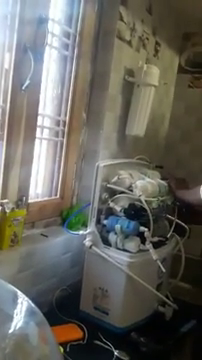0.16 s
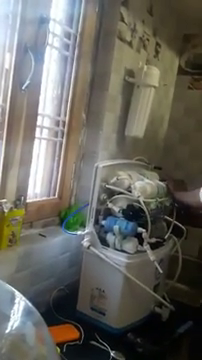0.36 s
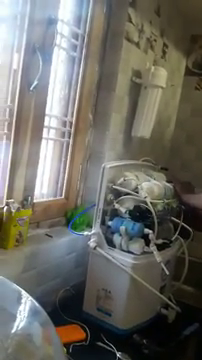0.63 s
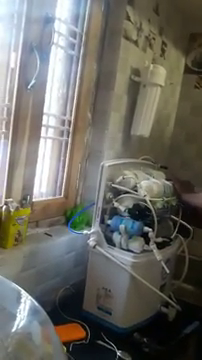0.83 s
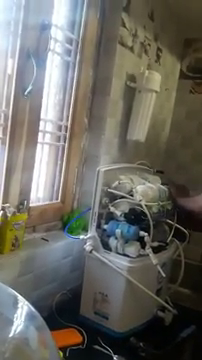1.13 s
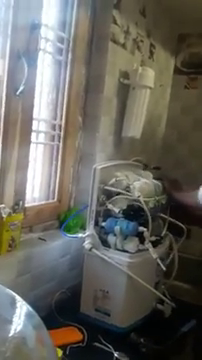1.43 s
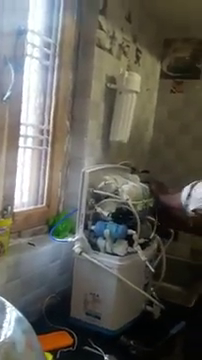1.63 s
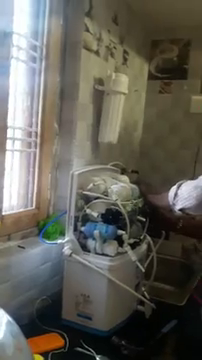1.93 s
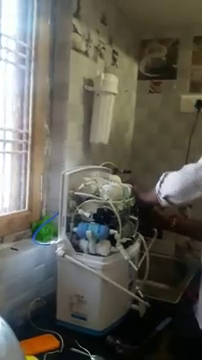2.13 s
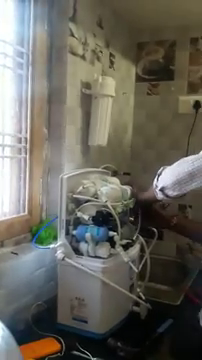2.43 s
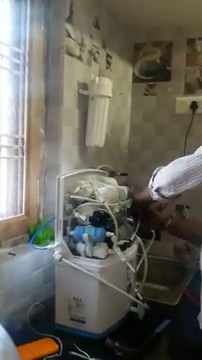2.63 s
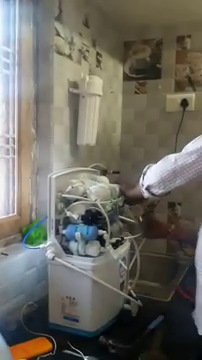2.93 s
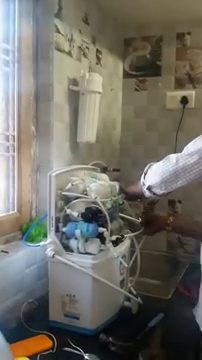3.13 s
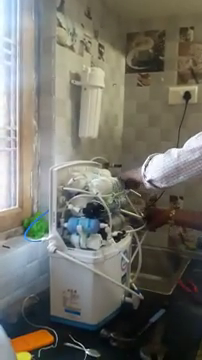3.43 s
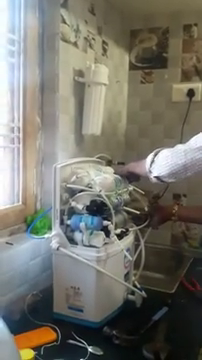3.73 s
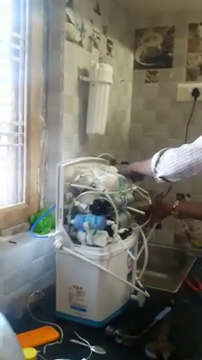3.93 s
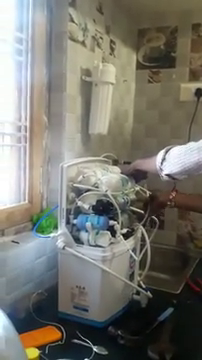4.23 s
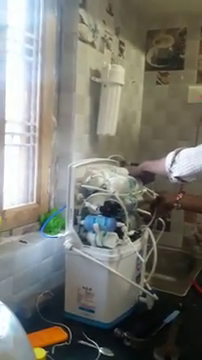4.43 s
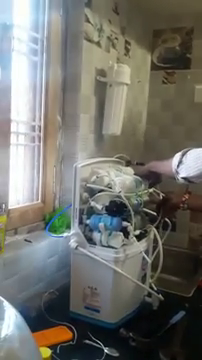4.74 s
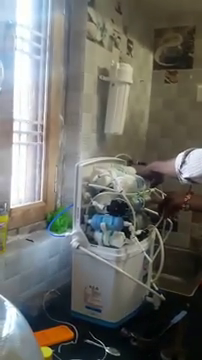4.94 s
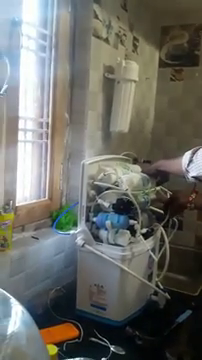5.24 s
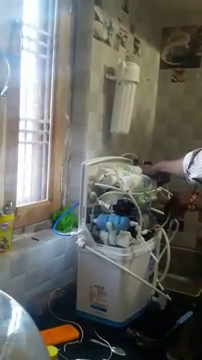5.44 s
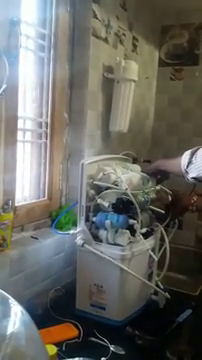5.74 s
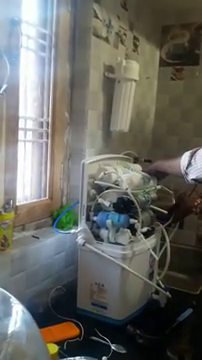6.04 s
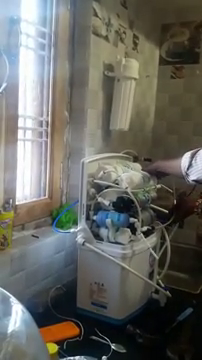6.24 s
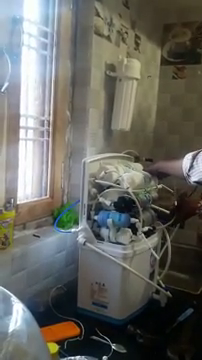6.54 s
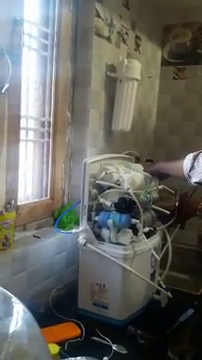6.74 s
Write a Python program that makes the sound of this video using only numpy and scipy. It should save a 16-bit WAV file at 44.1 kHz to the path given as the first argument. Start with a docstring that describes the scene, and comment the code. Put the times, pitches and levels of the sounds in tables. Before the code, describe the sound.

A small pump throbs quietly in a kitchen water purifier, with crackling air in the tubing and one short spurt of water. Suddenly a tube lets go, and a hard hissing spray whistles out and rings against a steel sink. It gradually loses pressure, leaving sputters, low gurgles and drips over the pump. The sound has a short tiled-room echo and little deep bass.

```python
"""The diaphragm pump of an opened water purifier throbs in a tiled kitchen, its knocks recurring with
each turn of the shaft, while air fizzes and squelches in the tubes. At 1.3 s a loosened tube spurts once.
At 2.8 s it releases a hard, shrieking jet of water and air whose drops excite the resonances of a steel
sink, and the unloaded pump runs a little faster. The jet darkens and fades as its pressure falls, and
from 5 s it gives way to a gurgling, spitting dribble."""
import sys
import numpy as np
from scipy import signal
from scipy.fft import rfft, irfft
from scipy.io import wavfile
from scipy.ndimage import uniform_filter1d

SR = 44100
rng = np.random.default_rng(int(sys.argv[2]) if len(sys.argv) > 2 else 0)


def digitize_waveform(pressure):
    """Quantize a signal to 16-bit integers and store it at the path in sys.argv[1].

    Rows of a 2-D input are taken as channels; values are limited to [-1, 1].
    """
    field = np.atleast_2d(pressure).T
    bounded = np.clip(field, -1, 1)
    quanta = np.round(bounded * 32767).astype(np.int16)
    wavfile.write(sys.argv[1], SR, quanta)


N = 302967
TIME = np.arange(N) / SR

# strength of the free jet: (time [s], level [dB])
JET_FLOW = [(2.84, -12.5), (3.46, -16.5), (3.6, -15.5), (4.14, -17.5), (4.25, -20), (4.42, -16.5),
            (4.78, -20), (5.17, -29.5), (5.23, -32)]
# spray at full, two-thirds, one-third and no pressure: (frequency [Hz], relative level [dB])
HARD_SPRAY = [(410, -52), (700, -22), (819, -8.5), (910, -16), (1060, -15), (1710, -8.5), (2270, -10.5),
              (2900, -2.5), (4430, -12), (5840, -11), (7290, -12), (10000, -21.5), (13000, -22.5),
              (16000, -34)]
FIRM_SPRAY = [(410, -50), (700, -17), (788, -8), (910, -20), (1020, -10), (1150, -17.5), (1420, -8),
              (2700, -1), (3250, -5), (3940, -12.5), (5920, -11), (7290, -9.5), (9800, -18), (13500, -21.5),
              (16000, -30)]
SOFT_SPRAY = [(410, -36), (700, -42), (767, -7), (898, -13), (1300, -5), (1840, -3.5), (2250, -1.5),
              (2770, 0.5), (3200, -6), (3940, -13), (5330, -9.5), (7200, -12), (9480, -21.5),
              (13000, -23.5), (16000, -36)]
SLACK_SPRAY = [(410, -43), (700, 3), (798, 7), (875, -5), (1040, 7), (1500, -2), (1840, -2), (2700, -7.5),
               (3940, -8), (5120, -13), (6400, -32.5), (12000, -27), (16000, -34)]
# resonances and antiresonances of sink and tube: (frequency [Hz], width [Hz], gain [dB])
SINK_RESONANCES = [(1022, 60, 3.5), (1162, 60, -4), (1259, 22, 7.5), (1438, 22, 8), (1830, 50, -3.5),
                   (2215, 50, -2), (1980, 30, 2), (2340, 40, -3), (2456, 22, 7), (2530, 40, -5),
                   (2645, 35, 4), (2738, 30, 6), (2828, 15, 5), (2965, 22, 5.5), (3270, 70, 3),
                   (3564, 25, 4.5), (3680, 90, -3), (4230, 70, 5), (4661, 170, -2.5), (5740, 60, 5.5),
                   (6010, 110, 4.5), (6196, 30, 5.5), (7250, 45, 7)]
# bottom of the sink drumming under the jet: (frequency [Hz], relative level [dB])
JET_DRUM_SPECTRUM = [(59, -62), (155, -29), (187, 0), (220, -7), (301, 3.5), (333, -22), (423, 4), (528, 0),
                     (784, -0.5), (900, -31), (1170, 3.5), (1980, -120)]
# spray of the spurt, and the sink drumming under it: (frequency [Hz], relative level [dB])
SPURT_SPECTRUM = [(290, -10), (500, 6.5), (630, -37), (843, -3), (1820, -2), (3200, 3.5), (3750, -1),
                  (4900, -3.5), (5850, 4.5), (6500, -2), (9350, -3), (10000, -8), (12500, -6), (16000, -18)]
SPURT_DRUM_SPECTRUM = [(90, -64), (172, 2.5), (231, -12), (273, 1.5), (389, -12), (612, -7.5), (674, -21),
                       (900, -13), (1170, -35), (1980, -120)]
# sputtering dribble, and its patter in standing water: (frequency [Hz], relative level [dB])
DRIBBLE_SPECTRUM = [(590, -53), (1000, -22), (1790, -13), (2030, -6), (2980, -6), (4260, -8), (6200, -3.5),
                    (7200, -6.5), (9800, -10.5), (15100, -13.5), (16000, -26)]
PATTER_SPECTRUM = [(240, -45), (329, -8), (550, -3), (676, -15), (830, 0), (1200, -5.5), (3500, -7.5),
                   (5500, -80)]
# knocks of diaphragms and valves in one turn of the shaft:
# (phase [turns], frequency [Hz], width [Hz], level [dB], decay time [s], change once unloaded [dB])
PUMP_KNOCKS = [(0.138, 810.5, 69, -49, 0.014, 4), (0.243, 430, 101, -52, 0.017, 6),
               (0.335, 610, 300, -59, 0.0064, -8), (0.577, 167, 30, -64, 0.022, 7.5),
               (0.71, 810, 100, -50.5, 0.0064, -34), (.74, 1400, 150, -52, 0.015, -26),
               (0.841, 515, 127, -55, 0.042, 0.5)]
# hum of the pump body: (multiple of shaft speed [ratio], loaded level [dB], unloaded level [dB])
PUMP_HARMONICS = [(15, -65, -81), (16, -61.5, -55), (17, -57.5, -84), (30, -72, -58), (39, -58.5, -68),
                  (47, -66, -56), (56, -61, -74), (70, -69, -66), (75, -60, -71), (81, -66, -71)]
# air pockets squeezed through the tubes:
# (time [s], level [dB], frequency [Hz], width over frequency [ratio], change per puff [dB])
SQUEEZED_POCKETS = [(.04, -49, 6650, 0.31, -11), (.087, -42, 2380, 0.29, -20), (.157, -45, 3730, .16, -12),
                    (0.363, -42, 2200, 0.17, -8), (.415, -46, 3500, 0.38, -5),
                    (.47, -43.5, 4350, 0.23, -15), (.67, -47.5, 3140, 0.18, -3),
                    (.76, -40.5, 3120, 0.24, -22), (.779, -33.5, 3910, .11, -17),
                    (.78, -48, 5560, 0.17, -10), (.946, -44.5, 5900, .2, -16),
                    (1.075, -59, 8700, 0.11, -24), (1.11, -48, 2350, 0.63, -20),
                    (1.836, -45, 2400, 0.18, -15), (2.09, -48, 5530, .27, -16),
                    (2.085, -44.5, 2800, .45, -13), (2.27, -49.5, 2974, .12, -9),
                    (5.388, -31, 2680, 0.42, -13), (5.433, -30, 2420, 0.48, -18),
                    (5.553, -41, 2887, .2, -20), (5.615, -39, 2680, .27, -15),
                    (5.672, -42.5, 2700, .2, -20), (6.23, -43, 2360, 0.32, -18),
                    (6.638, -35.5, 3100, .2, -14), (6.714, -41, 2360, .18, -1.5),
                    (6.773, -41.5, 2350, 0.26, -12)]
# sharp spits and clicks, including the tube cracking open:
# (time [s], level [dB], frequency [Hz], width [Hz])
SPITS_AND_CLICKS = [(.323, -40.5, 3020, 400), (.39, -47, 13900, 2960), (1.293, -31, 5170, 4000),
                    (1.449, -30, 9900, 4000), (1.849, -32, 2610, 700), (1.853, -41, 5500, 2980),
                    (1.879, -43.5, 4300, 3470), (1.903, -48, 6800, 1500), (2.802, -27, 11500, 6000),
                    (2.818, -31, 12500, 5000), (5.241, -26, 7900, 700), (5.241, -30, 2050, 250),
                    (5.402, -32, 2880, 1500), (5.441, -35.5, 3205, 2000), (5.613, -35.5, 5770, 2500),
                    (5.744, -30.5, 3340, 1900), (5.936, -36, 5000, 1800), (5.984, -34.5, 7500, 4000),
                    (6.04, -42, 13500, 3500), (6.093, -40, 11300, 1500), (6.218, -38.5, 8000, 5000),
                    (6.335, -43, 11900, 3000), (6.478, -34, 3730, 700), (6.587, -39, 5500, 2500),
                    (6.604, -39.5, 7300, 1500)]
# single drops on the steel: (time [s], level [dB], frequency [Hz])
DROP_IMPACTS = [(5.242, -30, 5000), (5.694, -34, 5600), (5.724, -36, 4800), (5.767, -34, 4400),
                (5.893, -29.5, 3300), (6.087, -33, 3154), (6.141, -34, 3730), (6.167, -36, 4630),
                (6.475, -28.5, 3920)]
# low gurgles, and thuds of water hitting the sink:
# (time [s], level [dB], frequency [Hz], width [Hz], decay time [s])
GURGLES_AND_THUDS = [(0.498, -44.5, 553, 69, 0.017), (1.105, -43.5, 483, 190, 0.044),
                     (1.128, -41, 192, 55, 0.016), (1.385, -31.5, 175, 34.8, .03),
                     (2.45, -50, 243, 100, 0.04), (3.235, -37.5, 312, 320, .082),
                     (5.48, -43.5, 200, 330, 0.06), (6.079, -40.5, 550, 150, 0.044),
                     (6.162, -37, 550, 140, 0.032), (6.299, -36, 547, 110, .04),
                     (6.441, -41.5, 552, 140, 0.046)]
# spells of fine air in the shut tubes: (start [s], end [s], level [dB])
FIZZ_SPELLS = [(0, 0.217, -51), (0.393, .63, -56), (0.844, 1.152, -53.5), (1.596, 1.78, -49.5),
               (1.865, 1.94, -51), (2.208, 2.43, -52.5), (2.514, 2.713, -57.5)]
# fizz of that air: (frequency [Hz], relative level [dB])
FIZZ_SPECTRUM = [(880, -41), (1500, 1), (2400, 1.5), (4690, -5.5), (7200, -8.5), (14500, -22.5),
                 (16000, -28)]
# noise of motor, flowing water and room: (frequency [Hz], relative level [dB])
BACKGROUND_SPECTRUM = [(26, -44), (45, -2.5), (109, -6.5), (174, 0), (291, -1), (432, -1), (798, -2.5),
                       (1150, -3.5), (1370, -6.5), (1670, -7), (3160, -8.5), (4140, -18), (5990, -13),
                       (12500, -29), (16000, -28)]
# reverberation of the kitchen: (frequency [Hz], time to fall 60 dB [s])
REVERB_TIMES = [(150, 0.43), (1000, 0.2), (4000, 0.34), (14000, 0.013)]
# dips and a peak of the microphone port: (frequency [Hz], width [Hz], gain [dB])
PORT_RESONANCES = [(3900, 260, -4), (8020, 300, -5.5), (8380, 300, 1.5)]

CRACK_S, FREE_S, OPENING_S = 2.784, 2.824, 0.024  # the joint cracks open, comes free, takes this to open


def jet():
    """Random impacts excite the sink's resonances; the spray darkens as the driving pressure falls."""
    leak_db, leak_rise_db_per_s, leak_tilt_db_per_octave = -33, 350, 3.5
    fall_db_per_s, slug_hz = 41, 38
    pressure = pressure_left()
    free = np.clip((TIME - FREE_S) / OPENING_S, 0, 1)
    leak_growth_db = leak_rise_db_per_s * (np.minimum(TIME, FREE_S) - CRACK_S)
    leak = (TIME > CRACK_S) * (1 - free) * gain_of(leak_db + leak_growth_db)
    fade_db = fall_db_per_s * np.maximum(TIME - JET_FLOW[-1][0], 0)
    flow = free * gain_of(np.interp(TIME, *np.transpose(JET_FLOW)) - fade_db)
    # at high pressure, slugs of water and air leave the tube in turn
    slug_phase = 2 * np.pi * np.cumsum(slug_hz * flutter(depth_db=-7, hz=7.8)) / SR
    slugs = gain_of(0.3 * pressure ** 2 * np.sin(slug_phase))
    impacts = drops(per_s=4000, spread_db=1.5, mist=0.74) * flutter(depth_db=-0.93, hz=119) * slugs
    hz, t, spectra = signal.stft(kitchen(impacts, wet_db=-9), SR, nperseg=2048, noverlap=1536)
    sprays = np.array([curve_at(s, hz) for s in (SLACK_SPRAY, SOFT_SPRAY, FIRM_SPRAY, HARD_SPRAY)])
    frame_pressure = np.interp(t, TIME, pressure)
    blend = [np.interp(frame_pressure, np.linspace(0, 1, 4), weights) for weights in np.eye(4)]
    tilt = np.interp(t, [FREE_S, FREE_S + OPENING_S], [leak_tilt_db_per_octave, 0])  # the leak is bright
    db = sprays.T @ blend + np.log2((hz[:, None] + 200) / 3000) * tilt
    db += resonance_db(SINK_RESONANCES, hz)[:, None]
    db += 20 * np.log10((hz[:, None] + 1) / (hz[:, None] + 400))  # fine spray carries no bass
    # the point of impact wanders, so the resonances come and go
    ripple = uniform_filter1d(rng.standard_normal(db.shape), size=9, axis=0)
    db += 1.42 * unit_rms(uniform_filter1d(ripple, size=22, axis=1))
    colour = gain_of(db) / np.sqrt(np.mean(gain_of(db) ** 2, axis=0))
    spray = unit_rms(signal.istft(spectra * colour, SR, nperseg=2048, noverlap=1536)[1][:N])
    spray *= flutter(depth_db=1, hz=70) ** (1 - pressure)  # the slack jet breaks up
    drum = coloured(drops(per_s=2200, spread_db=2.5, mist=0.49), JET_DRUM_SPECTRUM)
    return spray * (leak + flow) + drum * gain_of(-26) * flow ** 0.74


def pressure_left():
    """The driving pressure, as a share of its full value, falls linearly once the tube is free."""
    emptying_s = 2.87
    return np.clip(1 - (TIME - FREE_S) / emptying_s, 0, 1)


def whistle():
    """Flow-induced oscillation: at high pressure the tube's lip shrieks, unsteady in pitch and level."""
    pitch_hz = 2970 * flutter(depth_db=0.2, hz=260)
    tone = np.sin(2 * np.pi * np.cumsum(pitch_hz) / SR)
    shriek = unit_rms(tone * flutter(depth_db=3.5, hz=70))  # broken up by slugs of water
    level = gain_of(-21) * envelope(FREE_S, end_s=3.05, rise_s=OPENING_S, fall_db_per_s=33)
    return kitchen(shriek * level, wet_db=-6)


def spurt():
    """Impact noise: spray sags while the tube is briefly open and drives the sink's bottom to drum."""
    open_s, shut_s, sag_db_per_s = 1.292, 1.587, 20
    spray = coloured(drops(per_s=4000, spread_db=1.3, mist=1.1), SPURT_SPECTRUM)
    spray *= flutter(depth_db=0.7, hz=60)
    spray *= gain_of(-28 - sag_db_per_s * (TIME - open_s))
    spray *= envelope(open_s, shut_s, rise_s=0.0068, fall_db_per_s=167)
    drum = coloured(drops(per_s=410, spread_db=1.5, mist=0.73), SPURT_DRUM_SPECTRUM)
    drum *= gain_of(-34) * envelope(open_s, shut_s, rise_s=0.086, fall_db_per_s=107)
    out = spray + drum
    water_slug = burst(db=-25, hz=5550, width_hz=7000, decay_s=0.029, skirt=0.97, rise_s=0.0016)
    add(out, 1.366, water_slug)
    return out


def dribble():
    """Stream break-up: the slack, swaying flow sputters with bubbles, then patters in standing water."""
    start_s, settling_s, patter_start_s = 4.96, 0.48, 6.14
    sputter = pops(per_s=1100, spread_db=2.5, decay_s=0.007, breadth=0.18)
    sputter += 0.75 * drops(per_s=900, spread_db=1, mist=0.8)
    sputter = coloured(sputter * flutter(depth_db=1, hz=16), DRIBBLE_SPECTRUM)
    small_spits = pops(per_s=40, spread_db=2, decay_s=0.012, breadth=0.15)
    sputter += gain_of(-11) * coloured(small_spits, DRIBBLE_SPECTRUM)
    excess_db = 14 * np.exp(-np.maximum(TIME - start_s, 0) / settling_s)
    sputter *= gain_of(-46 + excess_db) * envelope(start_s, rise_s=0.14)
    landings = drops(per_s=760, spread_db=-1.5, mist=0.16) * flutter(depth_db=0.5, hz=30)
    patter = coloured(landings, PATTER_SPECTRUM) * gain_of(-43.5) * envelope(patter_start_s, rise_s=0.01)
    return kitchen(sputter + patter, wet_db=-7, wander_hz=1.3)


def pump():
    """Periodic excitation: knocks recur with each turn, over a hum of harmonics of the shaft speed."""
    loaded_hz, unloaded_hz, jet_drag_hz, spin_up_s = 11.16, 12.22, 0.075, 0.2
    relief = np.clip((TIME - CRACK_S) / spin_up_s, 0, 1)
    shaft_hz = loaded_hz + relief * (unloaded_hz - jet_drag_hz * pressure_left() - loaded_hz)
    turns = np.cumsum(shaft_hz) / SR
    out = np.zeros(N)
    # at the higher speed, other harmonics meet the resonances of the body
    for multiple, loaded_db, unloaded_db in PUMP_HARMONICS:
        tone = np.sin(2 * np.pi * (multiple * turns + rng.random()))
        harmonic = unit_rms(tone * flutter(depth_db=1.5, hz=12))
        out += gain_of(loaded_db + relief * (unloaded_db - loaded_db)) * harmonic
    for phase, hz, width_hz, db, decay_s, change_db in PUMP_KNOCKS:
        knock = burst(db, hz, width_hz, decay_s, skirt=0.92, rise_s=0.0016)
        for s in np.interp(np.arange(int(turns[-1]) + 1) + phase, turns, TIME):
            add(out, s, knock * gain_of(change_db * (s > CRACK_S) + 0.73 * rng.standard_normal()))
    return out


def squelches():
    """Smaller cavities resonate higher: an air pocket shrinks, each puff higher and fainter."""
    puffs, gap_s, pitch_ratio = 3, 0.085, 1.34
    out = np.zeros(N)
    for s, db, first_hz, breadth, step_db in SQUEEZED_POCKETS:
        for k in range(puffs):
            hz = first_hz * pitch_ratio ** k
            puff = burst(db + k * step_db, hz, breadth * hz, decay_s=0.033, skirt=0.72, rise_s=0.0069)
            add(out, s + k * gap_s, puff)
    return kitchen(out * flutter(depth_db=2.4, hz=170), wet_db=-6.5)


def spits_and_clicks():
    """Transients with an abrupt onset: sharp spits and clicks, including the tube cracking open."""
    out = np.zeros(N)
    for s, db, hz, width_hz in SPITS_AND_CLICKS:
        add(out, s, burst(db, hz, width_hz, decay_s=0.0088, skirt=1.05, rise_s=0.0007))
    return kitchen(out, wet_db=-4)


def ticks():
    """A brief impact has a broad spectrum: single drops tick on the steel."""
    out = np.zeros(N)
    for s, db, hz in DROP_IMPACTS:
        add(out, s, burst(db, hz, width_hz=0.38 * hz, decay_s=0.0023, skirt=0.92, rise_s=0.0002))
    return kitchen(out, wet_db=-6.5)


def gurgles_and_thuds():
    """Damped resonance: low gurgles, and thuds of water hitting the sink, waver as they die away."""
    out = np.zeros(N)
    for s, db, hz, width_hz, decay_s in GURGLES_AND_THUDS:
        add(out, s, burst(db, hz, width_hz, decay_s, skirt=2, rise_s=8 * decay_s ** 2))
    return kitchen(out * flutter(depth_db=-1, hz=90), wet_db=-4)


def fizz():
    """Superposition: fine air crackles in the tubes, and the smallest bubbles merge into a hiss."""
    level = sum(gain_of(db) * envelope(start_s, end_s, rise_s=0.0044, fall_db_per_s=91)
                for start_s, end_s, db in FIZZ_SPELLS)
    crackle = pops(per_s=1200, spread_db=3.5, decay_s=0.0042, breadth=0.23)
    crackle += 0.46 * rng.standard_normal(N)
    crackle *= flutter(depth_db=2, hz=25)
    return kitchen(coloured(crackle, FIZZ_SPECTRUM) * level, wet_db=-6.5)


def background():
    """Broadband noise of motor, flowing water and room forms a continuous floor."""
    noise = rng.standard_normal(N) * flutter(depth_db=2.5, hz=17)
    return gain_of(-48) * coloured(noise, BACKGROUND_SPECTRUM)


def kitchen(x, wet_db, wander_hz=0):
    """Direct and reverberant sound add; a wandering source keeps meeting different reflections."""
    if wander_hz:
        angle = 2 * np.pi * wander_hz * TIME
        wet = reflections(x * np.cos(angle)) + reflections(x * np.sin(angle))
    else:
        wet = reflections(x)
    return (x + gain_of(wet_db) * wet) / np.hypot(1, gain_of(wet_db))


def reflections(x):
    """Reverberation: dense echoes from the tiles decay exponentially, each band at its own rate."""
    echoes = rng.standard_normal(SR // 2) * (rng.random(SR // 2) < 0.1)
    hz, t, spectra = signal.stft(echoes, SR, nperseg=256)
    decay = gain_of(-60 * t / curve_at(REVERB_TIMES, hz)[:, None])
    tail = signal.istft(spectra * decay, SR, nperseg=256)[1]
    tail = np.pad(tail, (SR // 300, 0)) / np.linalg.norm(tail)
    return signal.fftconvolve(x, tail)[:N]


def drops(per_s, spread_db, mist):
    """Shot noise: impacts of random size, over a mist of drops too fine to tell apart."""
    sizes = gain_of(spread_db * np.minimum(rng.exponential(1, N), 4)) * rng.choice([-1, 1], N)
    impacts = unit_rms(sizes * (rng.random(N) < per_s / SR))
    return unit_rms(impacts + mist * rng.standard_normal(N))


def pops(per_s, spread_db, decay_s, breadth):
    """Tiny bubbles pop at random moments, each size ringing in its own band."""
    bubbles = [burst(10 * np.log10(hz), hz, breadth * hz, decay_s, rise_s=decay_s / 10, size=2048)
               for hz in np.geomspace(1500, 14000, 20)]
    out = np.zeros(N)
    for when, kind, chance in rng.random((8000, 3))[:int(per_s * N / SR)]:
        strength = max(chance, 0.05) ** (-spread_db / 8.7)
        add(out, when * N / SR, bubbles[int(kind * len(bubbles))] * strength)
    return unit_rms(out)


def burst(db, hz, width_hz, decay_s, rise_s, skirt=1, size=16384):
    """Noise in one resonance swells and decays exponentially; a larger skirt steepens the flanks."""
    f, t = np.fft.rfftfreq(size, 1 / SR) + 1, np.arange(size) / SR
    resonance = (1 + ((f - hz ** 2 / f) / width_hz) ** 2) ** -skirt
    shape = (1 - np.exp(-t / rise_s)) * np.exp(-t / decay_s)
    puff = irfft(rfft(rng.standard_normal(size)) * resonance) * shape
    return gain_of(db) * puff * np.sqrt(decay_s * SR / np.sum(puff ** 2))


def flutter(depth_db, hz):
    """Random modulation: a factor that wanders by depth_db rms, mostly at rates below hz."""
    lowpass = 1 / (1 + (np.fft.rfftfreq(N, 1 / SR) / hz) ** 2)
    wander = irfft(rfft(rng.standard_normal(N)) * lowpass, N)
    return gain_of(depth_db * unit_rms(wander))


def envelope(start_s, end_s=TIME[-1], *, rise_s, fall_db_per_s=0):
    """Exponential attack from start_s, exponential release from end_s."""
    attack = 1 - np.exp(-np.maximum(TIME - start_s, 0) / rise_s)
    return attack * gain_of(-fall_db_per_s * np.maximum(TIME - end_s, 0))


def resonance_db(peaks, hz):
    """Bell-shaped peaks and dips add up to one response in dB."""
    return sum(db / (1 + (2 * (hz - centre) / width) ** 2) for centre, width, db in peaks)


def coloured(x, spectrum):
    """Filters x by a spectrum and scales it to rms 1."""
    response = gain_of(curve_at(spectrum, np.fft.rfftfreq(N, 1 / SR)))
    return unit_rms(irfft(rfft(x) * response, N))


def curve_at(points, hz):
    """Interpolates linearly over log frequency."""
    f, value = np.transpose(points)
    return np.interp(np.log(hz + 1), np.log(f + 1), value)


def add(mix, s, sound):
    """Superposes a sound on the mix at time s."""
    start = round(s * SR)
    sound = sound[max(-start, 0):]
    part = mix[max(start, 0):][:len(sound)]
    part += sound[:len(part)]


def gain_of(db):
    """Decibels to amplitude."""
    return 10 ** (np.asarray(db) / 20)


def unit_rms(x):
    """Scales to rms 1."""
    return x / np.sqrt(np.mean(x ** 2) + 1e-20)


def scene():
    """Linear superposition of all sources, alike in both channels."""
    mono = pump() + background() + fizz() + spurt() + jet() + whistle() + dribble()
    mono += squelches() + spits_and_clicks() + ticks() + gurgles_and_thuds()
    return np.array([mono, mono])


def record(dry):
    """A small microphone loses deep bass, colours the treble, saturates softly and limits the band."""
    bass_hz, ceiling, edge_hz = 52, 0.9, 15850
    thinned = signal.sosfilt(signal.butter(4, bass_hz, "highpass", fs=SR, output="sos"), dry)
    port = gain_of(resonance_db(PORT_RESONANCES, np.fft.rfftfreq(N, 1 / SR)))
    tinted = irfft(rfft(thinned) * port, N)
    rounded = tinted / (1 + (tinted / ceiling) ** 6) ** (1 / 6)
    lowpass = signal.firwin(511, edge_hz, window=("kaiser", 9), fs=SR)
    return signal.oaconvolve(rounded, lowpass[None], "same")


dry = scene()
out = record(dry)
digitize_waveform(out)
```